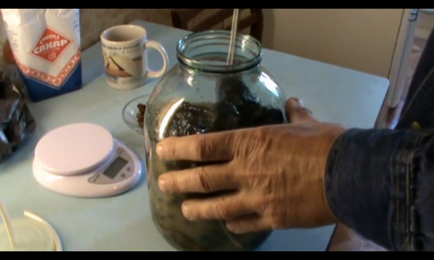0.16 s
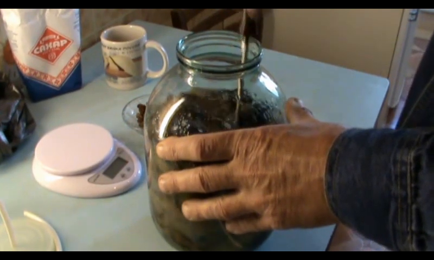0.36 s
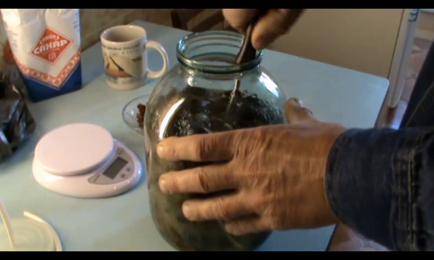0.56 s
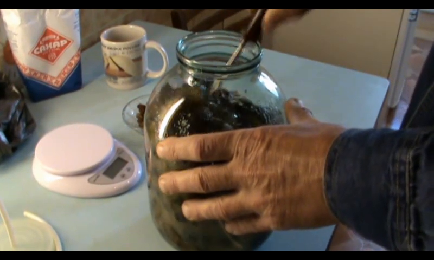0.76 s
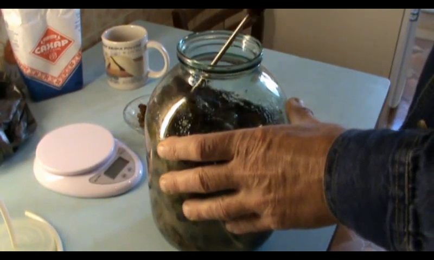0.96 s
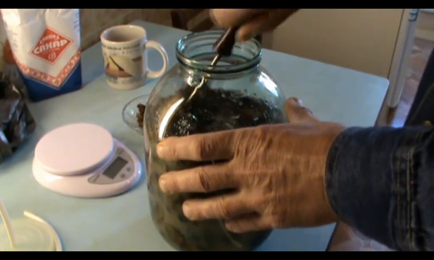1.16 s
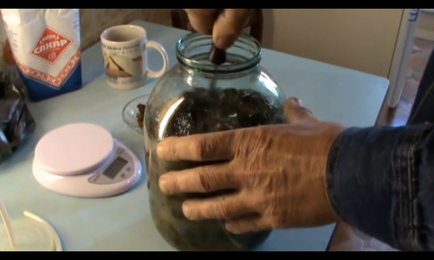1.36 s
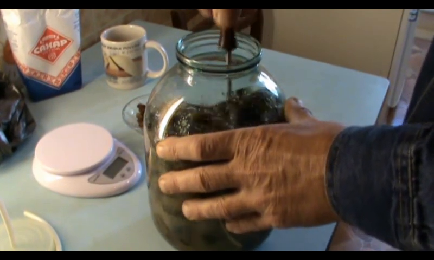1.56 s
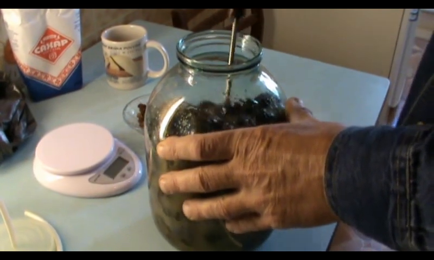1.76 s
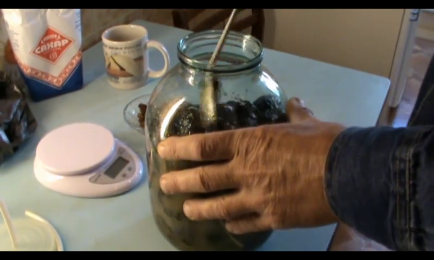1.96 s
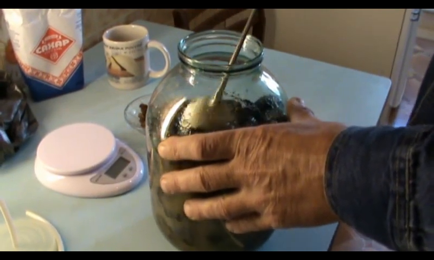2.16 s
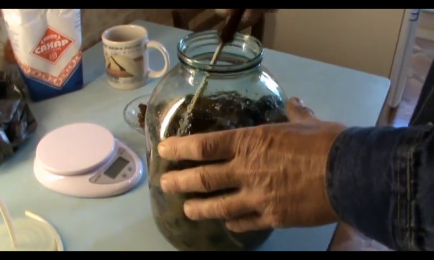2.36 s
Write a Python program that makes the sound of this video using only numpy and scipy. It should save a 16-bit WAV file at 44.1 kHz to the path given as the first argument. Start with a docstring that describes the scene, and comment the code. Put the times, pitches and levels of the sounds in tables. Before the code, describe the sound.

A steel spoon knocks unevenly against a large glass jar while stirring soaked fruit. The damped clinks come with faint squelches, soft bumps of the jar on the table and a brief scrape later on, heard close in a small kitchen.

```python
"""A long steel spoon stirs soaked fruit in a large glass jar, hand-held on a kitchen table.
It knocks and scrapes on the glass, damped by the filling and the hand; the wet fruit squelches and
pops, and the jar bumps the table. Heard from close by on a stereo pair of microphones.
The small room rings after each knock, and from farther off a soft tick, probably a wall clock,
comes once a second."""
import sys
import numpy as np
from scipy import signal
from scipy.fft import rfft, irfft
from scipy.io import wavfile

SR = 44100
rng = np.random.default_rng(int(sys.argv[2]) if len(sys.argv) > 2 else 0)


def dump(signal):
    """Clip the signal to [-1, 1] and save it as 16-bit WAV at the path in sys.argv[1]."""
    limited = np.clip(np.atleast_2d(signal).T, -1, 1)
    pcm = np.round(limited * 32767).astype(np.int16)
    wavfile.write(sys.argv[1], SR, pcm)


N = 105840
T = np.arange(N) / SR
HZ = np.maximum(np.fft.rfftfreq(2 * N, 1 / SR), 1)

# Diffuse sound at the pair. Each row: frequency in Hz, left-right correlation.
MIC_CORRELATION = [(100, 1), (250, 0.97), (500, 0.81), (1000, 0.25), (2000, 0.43), (4000, 0.26),
                   (8000, 0.43), (13000, 0.88)]
# Level between the microphones. Each row: frequency in Hz, left over right in dB.
MIC_BALANCE = [(40, 10), (90, -11), (170, 2), (330, 2), (650, -2.9), (1400, -2.3), (4500, 0.5), (8500, 0.5),
               (13000, 1.5)]
# Phase between the microphones. Each row: frequency in Hz, lead of the left in radians.
MIC_PHASE = [(100, 0.7), (300, 0.22), (580, -1.02), (1100, -0.15), (1460, 1), (2070, 0.38), (3400, 0.62),
             (4600, 0), (7300, 0.97), (10000, 0)]
# The quiet kitchen's background. Each row: frequency in Hz, relative level in dB.
ROOM_TONE_COLOUR = [(20, -28.5), (42, -4), (72, -20), (102, -3), (160, -5), (240, -6.5), (320, 3),
                    (410, -2.5), (510, -0.5), (700, -10.5), (1200, -22.5), (1600, -9.5), (2500, -10.5),
                    (4000, -15), (8000, -18), (15500, -20)]
# How long the kitchen rings. Each row: frequency in Hz, 60 dB decay time in seconds.
ROOM_DECAY = [(100, 0.47), (260, 0.21), (700, 0.41), (1800, 0.39), (4800, 0.41), (12800, .25)]
# Strength of its reflections. Each row: frequency in Hz, gain in dB.
ROOM_GAIN = [(100, 0.5), (500, 3), (1500, 0), (3500, -4), (9000, 5.5), (15000, -12.5)]
# The distant clock. Each row: start in seconds, level in dB.
CLOCK_TICKS = [(0.172, -47.5), (1.169, -48), (2.171, -49)]
# A tick from across the room. Each row: frequency in Hz, relative level in dB.
CLOCK_COLOUR = [(300, -50), (800, -3), (1400, 4.5), (2400, -2), (3500, 3), (5000, -1.5), (7800, 5),
                (9500, -1), (11500, -3.5), (13000, -15), (16000, -39)]
# The jar rocks on the table after a push. Each row: start in seconds, pitch in Hz, level in dB.
TABLE_BUMPS = [(.426, 158, -5), (0.651, 206.5, -15), (1.303, 141.4, -16.5), (1.306, 199.4, -15),
               (1.463, 171, -24.5), (1.643, 178.4, -10.5)]
# The squelching follows the stirring. Each row: time in seconds, level in dB.
SQUELCH_LEVEL = [(0, -61), (.6, -57), (.82, -61), (.95, -63), (1.2, -57.5), (1.38, -59), (1.5, -61.5),
                 (1.7, -59), (1.87, -63), (2.0, -64.5), (2.2, -58.5), (2.4, -64)]
# Wet fruit, close up. Each row: frequency in Hz, relative level in dB.
FRUIT_COLOUR = [(40, -11), (75, -15.5), (160, 3), (250, -16.5), (480, 0), (800, -6), (1400, -6.5),
                (3000, -15), (8000, -19), (15000, -23)]
# Air pockets burst in the fruit. Each row: start in seconds, pitch in Hz, level in dB.
AIR_POPS = [(0.685, 3500, -34.5), (0.862, 4560, -31), (.958, 11500, -24.5), (0.9577, 9000, -34.5),
            (1.39, 3330, -31), (1.945, 2400, -36), (2.054, 8650, -35), (1.675, 4760, -24.5),
            (1.679, 5850, -20), (2.376, 3150, -27.5)]
# Resonances of the filled jar with the spoon in it.
# Each row: frequency in Hz, relative level in dB, 60 dB decay time in seconds.
GLASS_MODES = [(161.9, -22, 0.37), (287.3, -24, 0.4), (330.2, -32, 0.34), (481.9, -12, 0.2),
               (508, -22, 0.31), (551.3, -21.5, .22), (624.7, -19.5, 0.19), (1106.6, -25.5, 0.1),
               (799, -28.5, 0.26), (1336, -20, 0.13), (1382, -32, 0.16), (1494, -20, 0.38),
               (1727, -20, 0.27), (1840, -33, 0.37), (1940, -45, 0.093), (2182, -21, 0.13),
               (2730, -17, 0.12)]
# The jar's crowd of weak, quickly damped modes. Each row: frequency in Hz, gain in dB.
CLACK_COLOUR = [(30, -23), (90, -7), (150, 3), (235, -16.5), (340, -2), (560, -2.5), (830, -8), (1150, -7),
                (1500, 3.5), (2400, 1.5), (3400, 1), (4300, -6), (7000, -7.5), (11000, -4.5), (15500, -20)]
# The spoon's chime. Each row: frequency in Hz, relative level in dB, 60 dB decay time in seconds.
STEEL_MODES = [(7460, -9, 0.031), (8845, -4, 0.041), (10680, -17.5, 0.024)]
# The spoon drags on the glass. Each row: start in seconds, length in seconds, drive in dB.
SCRAPE_STROKES = [(1.507, 0.13, -25), (1.812, .038, -11)]
# Tone of the dragging contact. Each row: frequency in Hz, gain in dB.
FRICTION_COLOUR = [(100, -35), (500, 0), (1100, 17.5), (1700, -9.5), (3200, -2), (6000, -2), (9000, -5),
                   (15000, -15)]
# The jar's six registers: thump, hollow, middle, clink, edge, treble.
# Each row: low edge in Hz, high edge in Hz.
JAR_REGISTERS = [(120, 200), (340, 780), (1000, 1230), (1400, 1900), (2600, 3400), (9000, 13000)]
# Each point of contact drives the registers differently and brings out one ring of spoon and glass.
# Each row: start in seconds, six register gains in dB, the ring's pitch in Hz, level in dB and
# 60 dB decay time in seconds, chime gain in dB, gain into the room in dB.
SPOON_KNOCKS = [ (0.002, 4, 9, 5, -8, -3.5, -11, 444, -12, 0.047, -43, 1),
                (0.072, -19, -18, -31, -31, -21.5, -51, 506, -39, 0.11, -47, -28),
                (0.2401, 5, 11.5, 3, 17.5, 11, 3, 1852, 9.5, 0.029, -8, 1),
                (0.4154, 18, 22.5, 24, 16, 10.5, -8.5, 1150, 6, 0.042, 1.5, 0),
                (0.4392, 9.5, 19.5, -4, 12.5, 7, -9, 3130, 2.5, 0.016, 0, -4.5),
                (0.6446, -4.5, 0, -5, -15, -37, -32, 330, -20.5, 0.017, -50, 0.5),
                (0.7242, -8.5, -3.5, -11, -16.5, -30, -42, 3180, -31, 0.0098, -36, 1),
                (0.7630, -5.5, -1, 1, -14.5, -24, -43, 320, -15, 0.03, -30, 1.5),
                (1.2895, -23, 1, 1, -1.5, -2, -24.5, 2960, -7.5, 0.0029, -29, -6.5),
                (1.6300, -6.5, -7.5, -14, -33, -48, -38, 1275, -21, 0.044, -45, 4),
                (1.6389, 11, 6.5, 2, 5.5, -6, -8.5, 1610, -10, 0.056, -19.5, -6.5),
                (1.7892, -11, -10.5, -11.5, -12.5, -19.5, -22.5, 1377, -16, 0.063, -26, -5.5),
                (2.1470, -28, -26, -35, -22, -27, -29, 1900, -46, 0.048, -50, -24)]


def from_db(db):
    """Decibels to gain."""
    return 10 ** (np.asarray(db) / 20)


def unit(x):
    """Scale to an energy of one."""
    return x / np.sqrt(np.sum(x ** 2) + 1e-20)


def at_hz(points, hz):
    """Read a table on a log-frequency axis."""
    f, v = np.transpose(points)
    return np.interp(np.log(hz), np.log(f), v)


def colour(x, points):
    """Causal (minimum-phase) filter that follows rows of frequency in Hz and gain in dB."""
    cepstrum = irfft(np.log(from_db(at_hz(points, HZ))))
    cepstrum[1:N] *= 2
    cepstrum[N + 1:] = 0
    return irfft(rfft(x, 2 * N) * np.exp(rfft(cepstrum)))[..., :N]


def through(x, response):
    """Play a signal through an impulse response."""
    return irfft(rfft(x, 2 * N) * rfft(response, 2 * N))[..., :N]


def decay(t60, t=T):
    """Exponential fall of 60 dB in t60 seconds."""
    return np.exp(-np.minimum(np.log(1000) * t / t60, 60))


def delayed(x, start_s):
    """Start a sound at the given time."""
    start = int(max(start_s, 0) * SR)
    return np.concatenate([np.zeros(start), x[:N - start]])


def mode(hz, t60):
    """A dying sine of unit energy."""
    return unit(np.sin(2 * np.pi * hz * T) * decay(t60))


def grains(per_s, spread_db):
    """Random clicks of uneven size, rms one."""
    sizes = from_db(spread_db * np.minimum(rng.exponential(1, N), 4))
    signs = rng.choice([-1, 1], N)
    return unit(sizes * signs * (rng.random(N) < per_s / SR)) * np.sqrt(N)


def diffuse_noise():
    """White noise as two closely spaced microphones hear it from all sides."""
    mid, side = rfft(rng.standard_normal((2, 2 * N)))
    alike = np.clip(at_hz(MIC_CORRELATION, HZ), -.99, .99)
    return irfft(np.sqrt((1 + alike) / 2) * mid + np.sqrt((1 - alike) / 2) * side * [[1], [-1]])[:, :N]


def room_tone(level_db=-58.5):
    """The faint, steady background all around the microphones."""
    return from_db(level_db) * unit(colour(diffuse_noise(), ROOM_TONE_COLOUR)) * np.sqrt(2 * N)


def clock(attack_s=0.0076, hold_s=0.033, t60=0.33):
    """Far ticks, smeared by the room into soft puffs."""
    envelope = 0
    for start, db in CLOCK_TICKS:
        rise = np.clip((T - start) / attack_s, 0, 1)
        envelope += from_db(db) * rise * decay(t60, np.maximum(T - start - hold_s, 0))
    return envelope * unit(colour(diffuse_noise(), CLOCK_COLOUR)) * np.sqrt(2 * N)


def kitchen_reverb(x, first_echo_s=0.006, build_s=0.0062, build_cycles=1.22):
    """Dense reflections swell and die away octave by octave; the bass builds up slowest."""
    noise, tail = rfft(diffuse_noise(), 2 * N), 0
    centres = np.geomspace(100, 12800, 8)
    for hz, pick in zip(centres, np.eye(len(centres))):
        band = irfft(noise * np.interp(np.log(HZ), np.log(centres), pick))[:, :N]
        rise = np.clip((T - first_echo_s) / (build_s + build_cycles / hz), 0, 1)
        tail += from_db(at_hz(ROOM_GAIN, hz)) * band * unit(rise * decay(at_hz(ROOM_DECAY, hz)))
    return through(x, tail)


def table_bumps():
    """The heavy jar thuds on the table top, which sways under each bump."""
    sway = from_db(-13.5) * mode(hz=46, t60=0.73)
    return sum(from_db(db) * delayed(mode(hz, t60=0.1) + sway, start) for start, hz, db in TABLE_BUMPS)


def wet_fruit(pop_bandwidth_ratio=0.073):
    """Dense squelches follow the stirring, and a few air pockets burst with a clear pop."""
    squelch = unit(colour(grains(per_s=700, spread_db=0.5), FRUIT_COLOUR)) * np.sqrt(N)
    fruit = squelch * from_db(np.interp(T, *np.transpose(SQUELCH_LEVEL)))
    for start, hz, db in AIR_POPS:
        burst = rng.standard_normal(N) * decay(t60=0.01)
        pop = signal.lfilter(*signal.iirpeak(hz, 1 / pop_bandwidth_ratio, fs=SR), burst)
        fruit += from_db(db) * delayed(unit(pop), start)
    return fruit


def jar_ring():
    """The clear resonances of the filled jar, alternating in polarity."""
    return sum((-1) ** k * from_db(db) * mode(hz, t60) for k, (hz, db, t60) in enumerate(GLASS_MODES))


def jar_clack(crack_db=-13.5, clatter_db=2.5):
    """The crack of a contact and the brief clatter of the damped modes, new for each blow."""
    clack = from_db(clatter_db) * unit(rng.standard_normal(N) * decay(t60=0.043))
    clack[0] += from_db(crack_db)
    return colour(clack, CLACK_COLOUR)


def spoon_chime():
    """The short, high ring of the steel."""
    return sum(from_db(db) * mode(hz, t60) for hz, db, t60 in STEEL_MODES)


def spoon_scrapes(resonances):
    """Tiny slips of steel on glass, growing as the spoon presses on."""
    slips, strokes = grains(per_s=1600, spread_db=2), 0
    for start, length, db in SCRAPE_STROKES:
        pressure = np.sqrt(np.clip((T - start) / length, 0, 1)) * (T < start + length)
        strokes += from_db(db) * unit(slips * pressure)
    return colour(through(strokes, jar_clack() + resonances), FRICTION_COLOUR)


def spoon_knocks(glass, chime, glass_send_db=-10.5, steel_send_db=-7.5):
    """The spoon hits the glass; returns the close sound and what goes into the room."""
    direct, to_room = 0, 0
    for start, *registers_db, ring_hz, ring_db, ring_t60, chime_db, room_db in SPOON_KNOCKS:
        contact = [(hz, db) for edges, db in zip(JAR_REGISTERS, registers_db) for hz in edges]
        # Offset the contact's gain, so the ring leaves that filter at ring_db.
        ring = from_db(ring_db - at_hz(contact, ring_hz)) * mode(ring_hz, ring_t60)
        clack = colour(jar_clack() + ring, contact)
        ringing = colour(glass, contact)
        steel = from_db(chime_db) * chime
        direct += delayed(clack + ringing + steel, start)
        send = clack + from_db(glass_send_db) * ringing + from_db(steel_send_db) * steel
        to_room += from_db(room_db) * delayed(send, start)
    return direct, to_room


def microphones(x):
    """The two microphones hear the sound with a difference in level and phase."""
    half_each = np.array([[.5], [-.5]])
    gain = from_db(at_hz(MIC_BALANCE, HZ) * half_each)
    phase = np.exp(1j * at_hz(MIC_PHASE, HZ) * half_each)
    return irfft(rfft(x, 2 * N) * gain * phase)[:, :N]


def scene():
    """Spoon, jar and fruit close to the microphones, the kitchen around them, the clock far off."""
    glass, chime = jar_ring(), spoon_chime()
    knocks, knocks_to_room = spoon_knocks(glass, chime)
    stirring = spoon_scrapes(glass + from_db(-8.5) * chime) + wet_fruit()
    bumps = table_bumps()
    background = room_tone()
    reverb = kitchen_reverb(knocks_to_room + from_db(-7) * stirring + from_db(-3.5) * bumps)
    return microphones(knocks + stirring + bumps + reverb) + clock() + background


def record(dry, ceiling=0.65, stopband_hz=16800):
    """The highest peaks are rounded off and the top of the treble is cut steeply."""
    rounded = ceiling * np.tanh(dry / ceiling)
    return signal.sosfilt(signal.cheby2(18, 80, stopband_hz, fs=SR, output="sos"), rounded)


dry = scene()
out = record(dry)
dump(out)
```